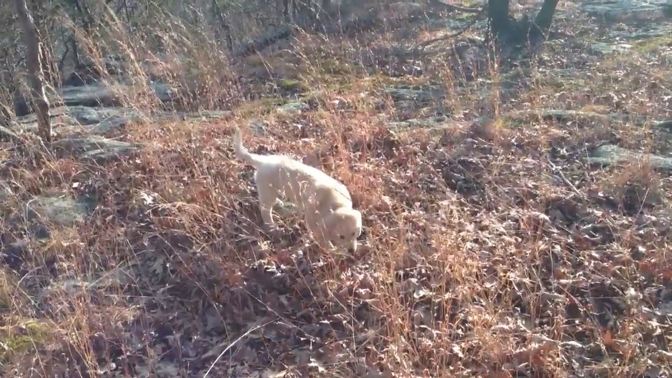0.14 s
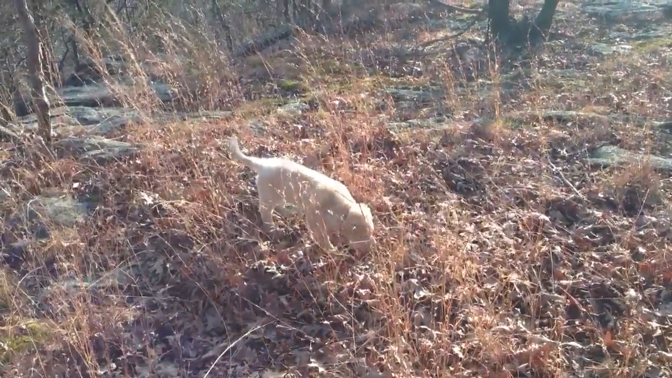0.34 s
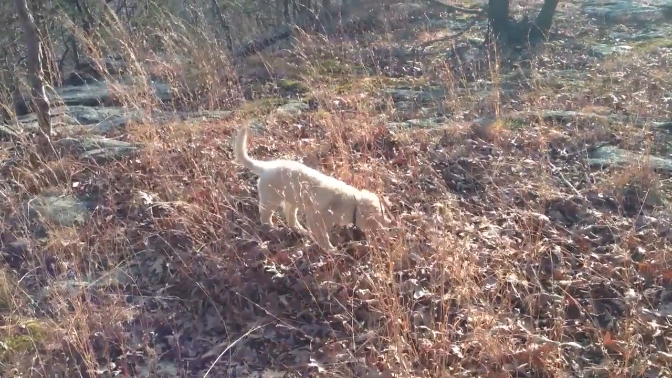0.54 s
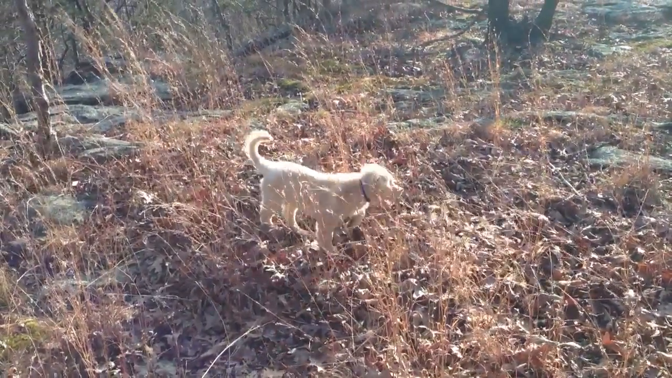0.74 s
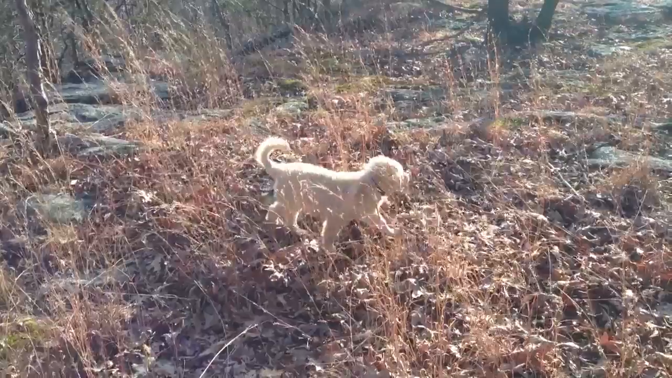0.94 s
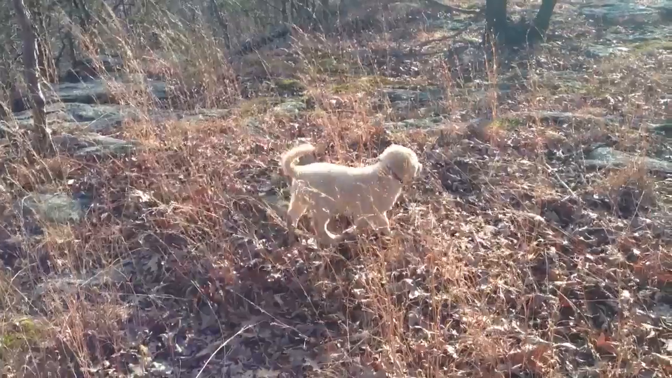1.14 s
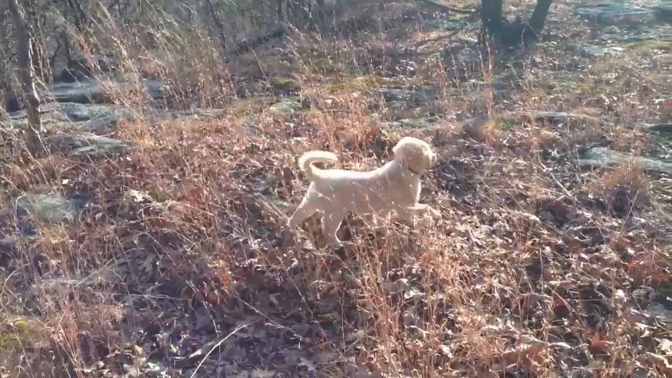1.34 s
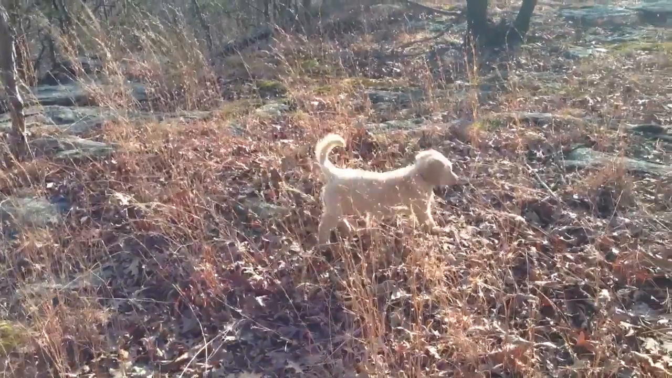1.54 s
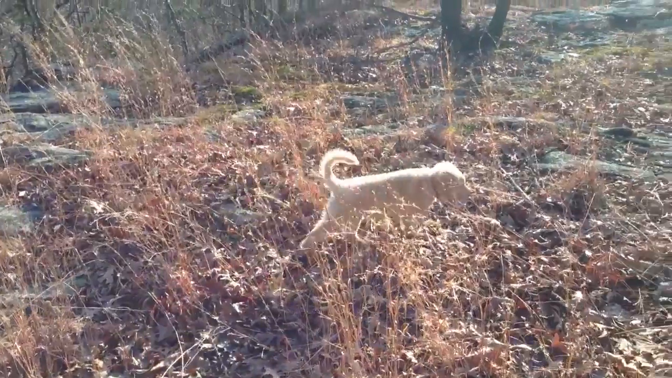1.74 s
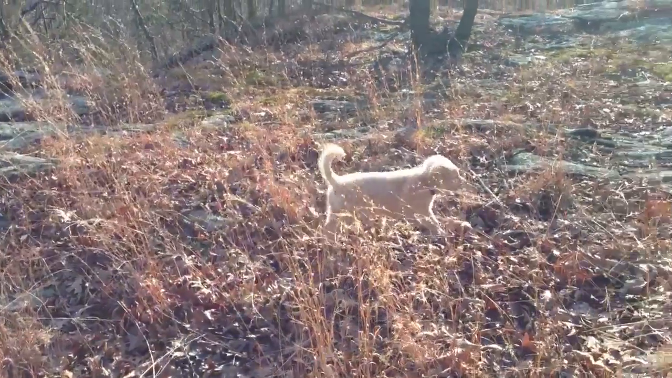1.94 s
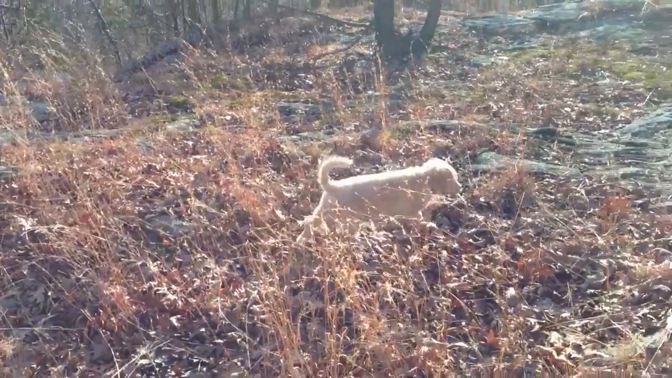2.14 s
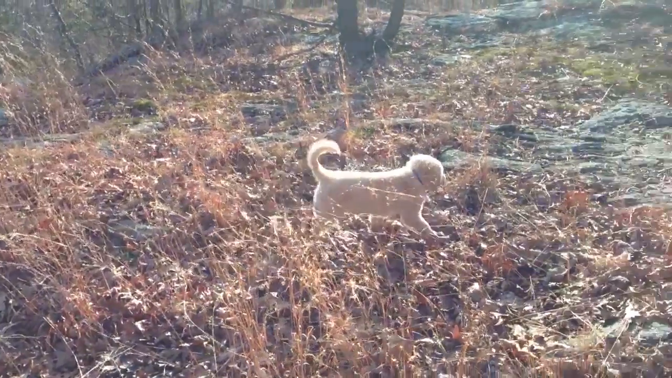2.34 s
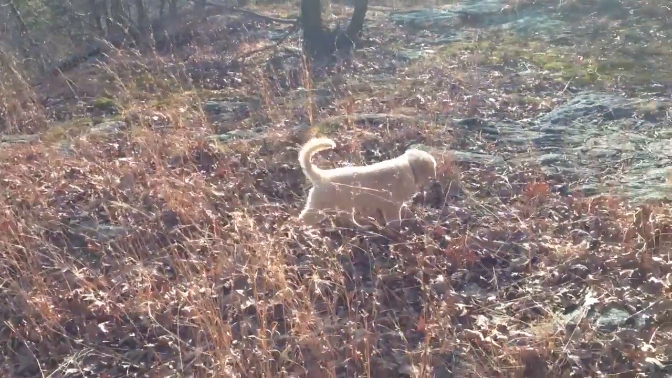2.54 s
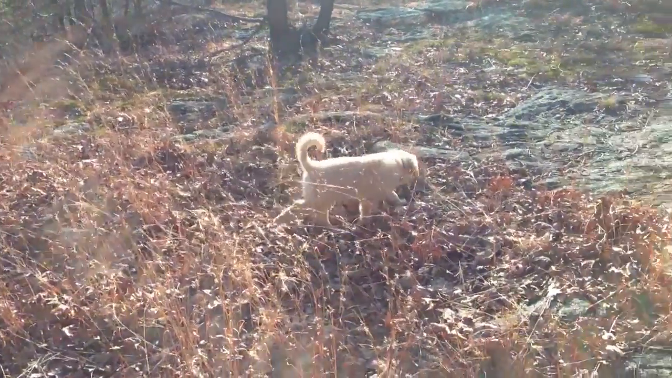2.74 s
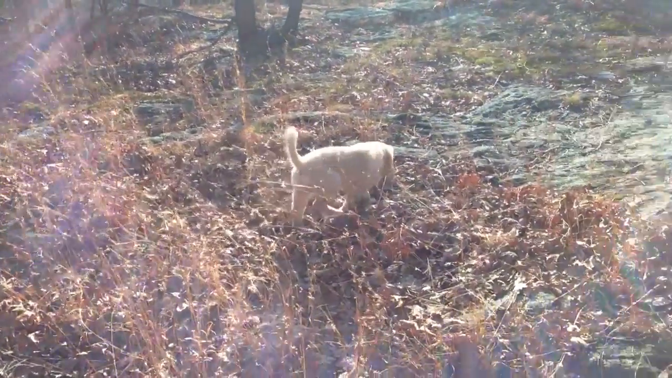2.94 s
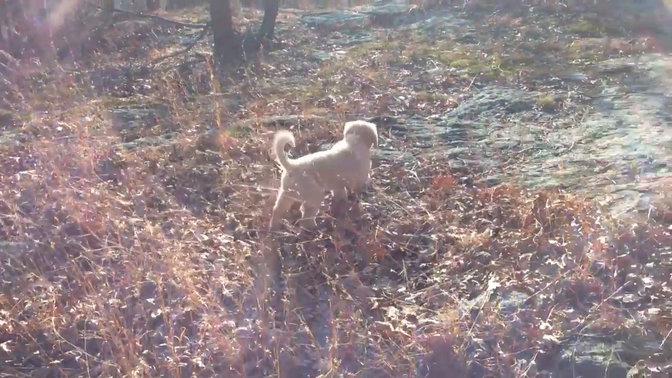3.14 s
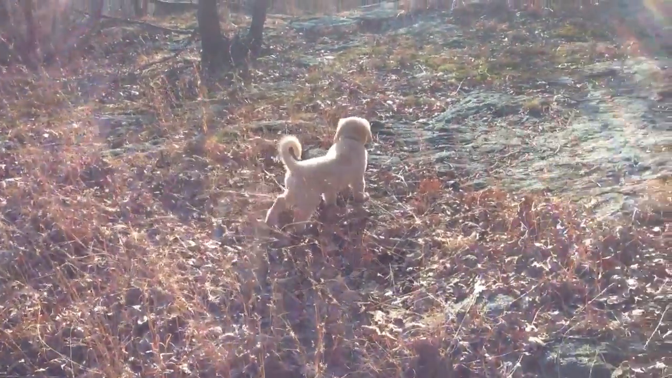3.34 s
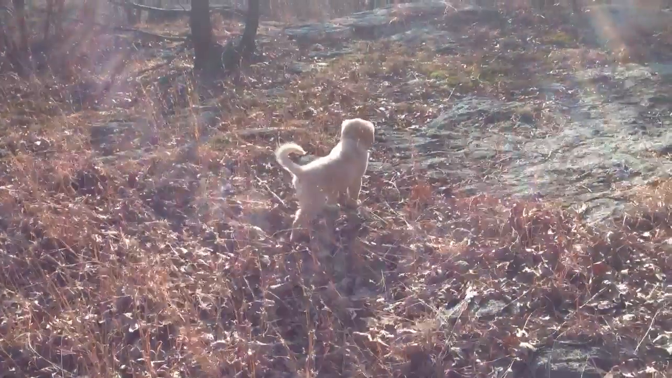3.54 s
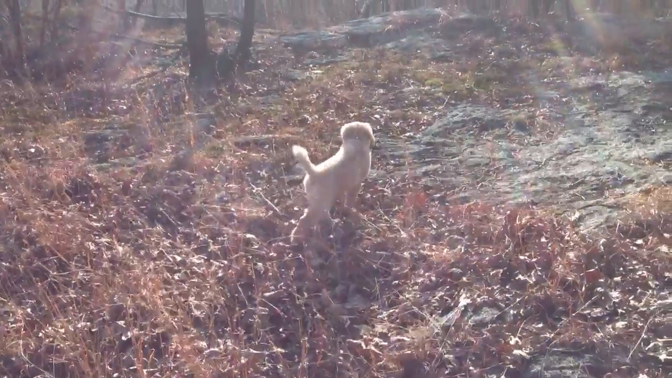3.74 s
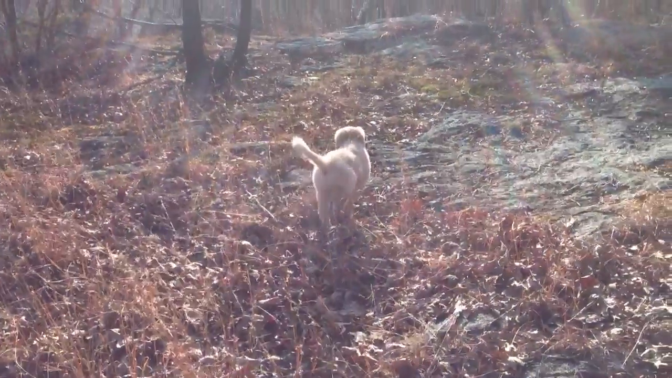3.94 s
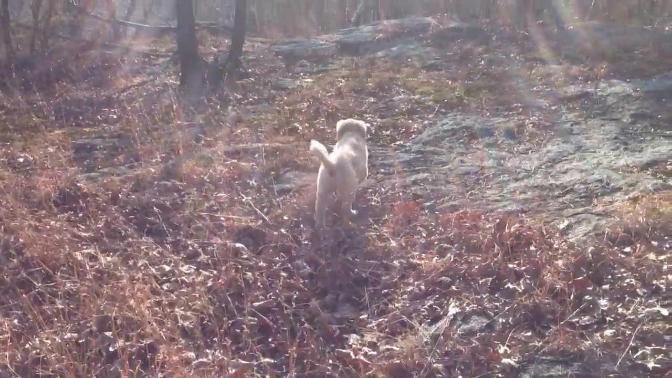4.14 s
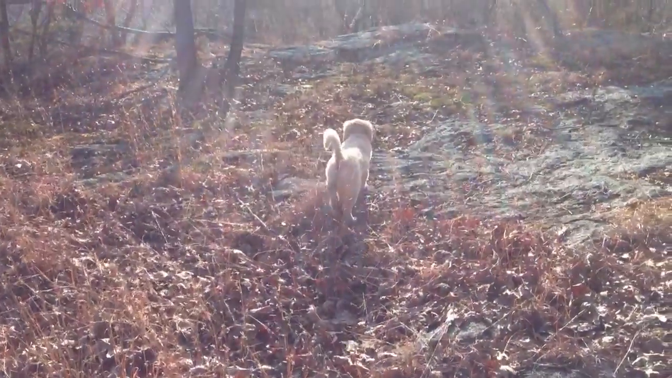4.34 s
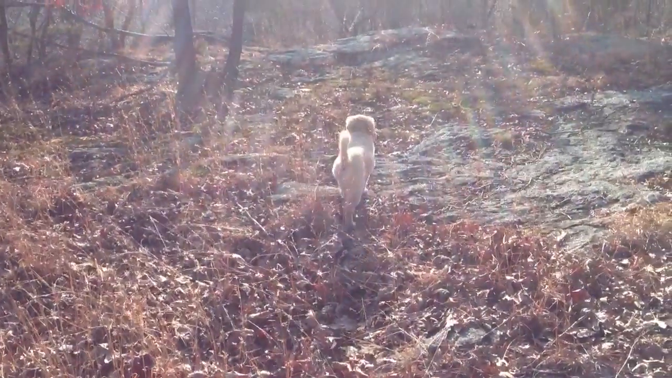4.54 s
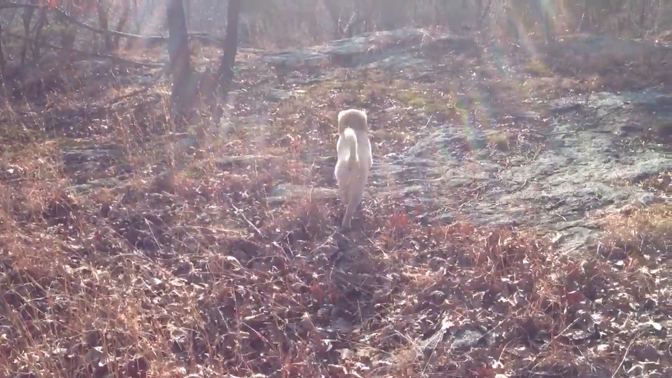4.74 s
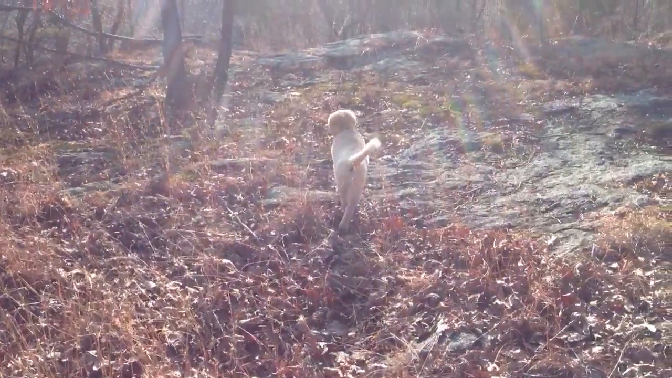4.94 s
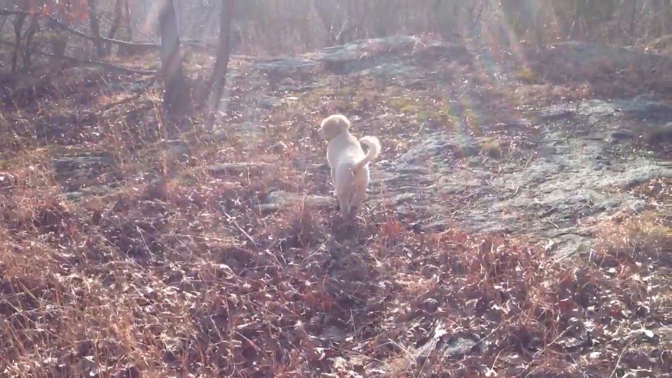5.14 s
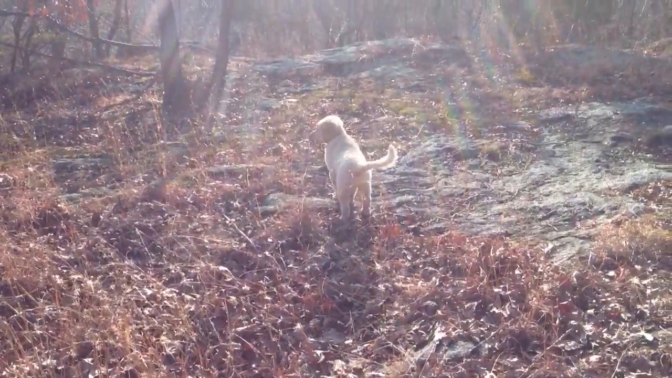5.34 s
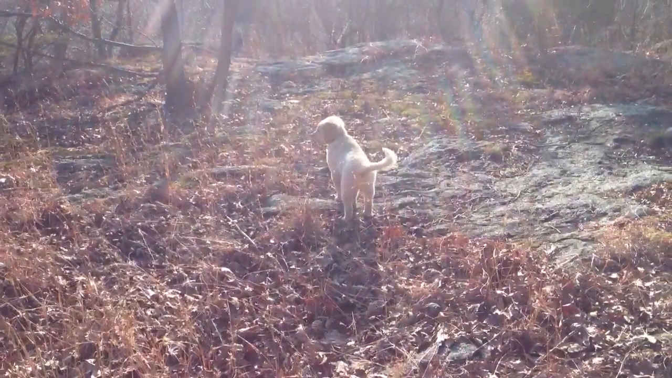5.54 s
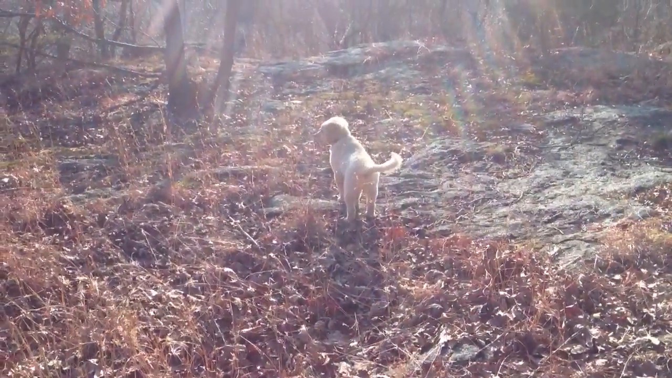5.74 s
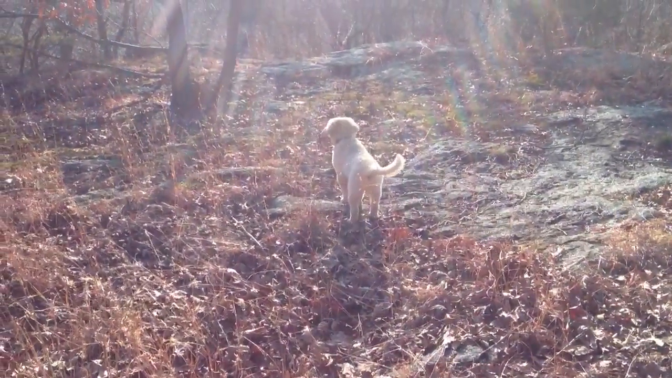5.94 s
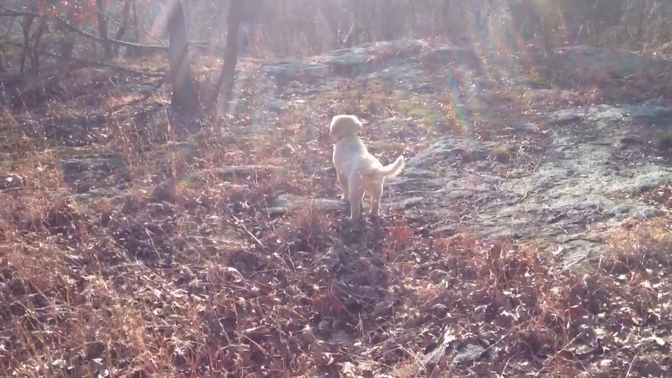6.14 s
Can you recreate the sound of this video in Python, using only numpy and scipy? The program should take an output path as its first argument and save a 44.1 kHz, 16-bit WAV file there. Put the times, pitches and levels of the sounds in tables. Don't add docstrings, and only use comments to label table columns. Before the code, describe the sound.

Brittle leaf litter crunches under light, quick paws, swelling to bright snapping close by, then thinning to faint ticks over distant rumble.

```python
import sys
import numpy as np
from scipy import signal
from scipy.fft import rfft, irfft
from scipy.io import wavfile
from scipy.ndimage import uniform_filter1d

SR = 44100
rng = np.random.default_rng(int(sys.argv[2]) if len(sys.argv) > 2 else 0)


def nominal_scale(level):
    x = np.asarray(level, float) / 20
    return 10 ** x


def dump_mix(stems):
    frames = np.atleast_2d(stems).T
    limited = np.clip(frames, -1, 1)
    pcm = np.round(limited * 32767).astype(np.int16)
    wavfile.write(sys.argv[1], SR, pcm)


N = 272964


def rms_one(x):
    return x / np.sqrt(np.mean(x ** 2) + 1e-20)


def in_time(rows):
    s, *columns = np.transpose(rows)
    return [np.interp(np.arange(N) / SR, s, column) for column in columns]


def drift(rate_hz):
    pole = np.exp(-2 * np.pi * rate_hz / SR)
    noise = rng.standard_normal(N + SR)
    settled = signal.lfilter([1], [1, -2 * pole, pole * pole], noise)[SR:]
    return rms_one(settled)


def ring(clicks, hz, t60_s):
    decay = nominal_scale(-60 / (t60_s * SR))
    turn = 2 * np.pi * hz / SR
    return signal.lfilter([0, np.sin(turn)], [1, -2 * decay * np.cos(turn), decay * decay], clicks + 1e-18)


def band(x, edges_hz):
    return signal.sosfilt(signal.butter(2, edges_hz, "band", fs=SR, output="sos"), x)


def colour(x, spectrum, size=8192):
    hz, level_db = np.transpose(spectrum)
    grid_hz = np.arange(size // 2 + 1) * SR / size + 1
    gain = nominal_scale(np.interp(np.log(grid_hz), np.log(hz), level_db))
    cepstrum = irfft(np.log(gain), size)
    cepstrum[1:size // 2] *= 2
    cepstrum[size // 2 + 1:] = 0
    response = irfft(np.exp(rfft(cepstrum)), size)
    return signal.fftconvolve(x, response)[:N]


SPLIT_HZ = 3000, 7000


def thirds(deep, middle, fine):
    hz = np.arange(N // 2 + 1) * SR / N
    below = 1 / (1 + (hz / SPLIT_HZ[0]) ** 6)
    above = 1 - 1 / (1 + (hz / SPLIT_HZ[1]) ** 8)
    shares = [(deep, below), (middle, 1 - below - above), (fine, above)]
    return [irfft(rfft(x) * share, N) for x, share in shares]


# (frequency [Hz], level [dB per Hz])
WOOD_SPECTRUM = [(25, -44), (60, -26), (85, -15.5), (130, -5.5), (250, -8), (400, -13), (480, -16.5),
                 (700, -13.5), (980, -15.5), (1150, -25.5), (3000, -26.5), (6000, -28.5), (15500, -30.5)]
# (pitch [Hz], curve of (time [s], level [dB]))
ENGINE_DRONES = [
    (199, [(0, -86), (.8, -63), (1.4, -92), (3.2, -73), (4.5, -79.5), (5, -67.5), (6.19, -67.5)]),
    (281, [(0, -63), (.4, -86), (2.6, -74), (3.5, -66.5), (4.2, -75.5), (4.9, -65.5), (5.75, -60.5), (6.19, -75)]),
    (368, [(0, -110), (1.4, -70), (2.4, -75), (3.5, -77), (5.3, -69.5), (6.19, -75)]),
]


def distance():
    out = nominal_scale(-62 - 1.5) * rms_one(colour(rng.standard_normal(N), WOOD_SPECTRUM))
    rumble = band(band(rng.standard_normal(N), (105, 260)), (105, 260))
    out += nominal_scale(-74.0 + 3.6 * drift(7.9)) * rms_one(rumble)
    for hz, curve in ENGINE_DRONES:
        phase = 2 * np.pi * np.cumsum(hz + 3.106 * drift(5.37)) / SR
        level_db = in_time(curve)[0] - 1.5 + 2.0 * drift(6.7)
        out += nominal_scale(level_db) * np.sin(phase)
    return out


# (time [s], rustle at 3-7 kHz [dB], deep crunch over it [dB])
GRASS_BRUSH = [(0, -61.5, -3.5), (.18, -62.5, 3), (.5, -58.5, 2), (.92, -59, -4.5), (1.14, -52, -1.5),
               (1.47, -55.5, -9), (1.88, -52, -6.5), (2.3, -48.5, -8), (2.8, -51, -2.5),
               (2.95, -55.5, -6.5), (3.7, -52.5, -4.5), (4.12, -55.5, -8.5), (4.55, -60, -7),
               (4.78, -67.5, -8), (5.3, -74, -12), (5.6, -75, -13), (6.19, -75, -3)]
# (full weight time [s], hold [s], crackle at 3-7
# kHz [dB], deep crunch over it [dB])
PAW_STEPS = [(0, 0.012, -57.5, -17), (.09, .045, -57.5, 1.5), (.21, 0.055, -63, 2), (.36, 0.11, -58.5, 3),
             (.565, 0.05, -53.5, -1.5), (.65, 0.011, -47, -26), (.72, 0.069, -53, -3.5),
             (.94, .015, -60, -3), (.98, .1, -46.5, -5.5), (1.17, .07, -50, -7),
             (1.25, 0.066, -47.5, -4.5), (1.39, 0.035, -50, -9), (1.52, 0.096, -49.5, -8.5),
             (1.595, 0.016, -48.5, -1), (1.635, 0.024, -38, -10), (1.685, 0.032, -47, -8),
             (1.73, 0.037, -43, -9), (1.96, 0.033, -44.5, -6.5), (2.0, .1, -49, -4.5),
             (2.137, 0.073, -35, -7.5), (2.2, 0.04, -46, -3.5), (2.335, 0.023, -48.5, -4.5),
             (2.375, 0.035, -39.5, -6), (2.44, 0.082, -47, -8), (2.55, 0.1, -43, -3.5),
             (2.695, 0.028, -44, -12), (2.74, 0.083, -48, -8),
             (2.994, .05, -51, -4), (3.061, 0.04, -44.5, -5), (3.116, 0.017, -51, -7),
                 (3.147, 0.014, -43.5, -7), (3.286, 0.12, -48, -6.5), (3.42, .06, -52, -5),
                 (3.587, 0.14, -49, -8.5), (3.698, 0.024, -45.5, -7.5), (3.8, 0.07, -50.5, -5.5),
                 (3.922, 0.055, -52.5, -9), (4.01, 0.041, -55.5, -3.5), (4.162, 0.094, -51.5, -11.5),
                 (4.299, 0.056, -52, -5), (4.39, .11, -56, -12), (4.595, 0.032, -60.5, -6),
                 (4.644, 0.052, -52, -6), (4.876, 0.013, -50.5, -6), (4.927, 0.038, -66.5, -6),
                 (5.006, 0.071, -63, -9), (5.114, 0.061, -54, -8.5), (5.255, 0.045, -65.5, -11),
                 (5.444, 0.064, -57, -7.5), (5.745, .01, -73, -7)]


def tread():
    press_db_per_s, lift_db_per_s = 529, 376
    hop = 44
    t = np.arange(0, N, hop) / SR
    brush_db, brush_deep_db = np.array(in_time(GRASS_BRUSH))[:, ::hop]
    power, deep = nominal_scale(2 * brush_db), nominal_scale(2 * (brush_db + brush_deep_db))
    for s, hold_s, crackle_db, crunch_db in PAW_STEPS:
        press_db = press_db_per_s * np.maximum(s - t, 0)
        lift_db = lift_db_per_s * np.maximum(t - s - hold_s, 0)
        step = nominal_scale(2 * (crackle_db - press_db - lift_db))
        power = power + step
        deep = deep + step * nominal_scale(2 * crunch_db)
    curves = np.transpose([t, 10 * np.log10(power), 10 * np.log10(deep / power)])
    level_db, deep_db = in_time(curves)
    fine_db = -2.5 - 0.34 * deep_db
    return level_db, deep_db, fine_db


def crackle(per_s, spread_db, clump_db, patchy_db, cycles, count=14):
    sizes = nominal_scale(spread_db * np.minimum(rng.exponential(1, N), 3.8)) * rng.choice([-1, 1], N)
    born = rng.random(N) < per_s * nominal_scale(clump_db * drift(45)) / SR
    dealt = rng.integers(0, count, N)
    out = np.zeros(N)
    for k, hz in enumerate(np.geomspace(500, 15000, count)):
        leaf = rms_one(ring(sizes * born * (dealt == k), hz, cycles / hz))
        out += leaf * np.sqrt(hz) * nominal_scale(patchy_db * drift(17.7))
    return out


# (frequency [Hz], level [dB per Hz])
LEAF_SPECTRUM = [(250, -26), (400, -14.5), (700, -12.5), (1100, -8.5), (1500, -7), (1950, -2), (2900, -4),
                 (3800, -3), (5000, 0.5), (6200, -1.5), (6900, -2), (8000, -4), (11500, -4.5),
                 (15500, -10.5)]


def litter(level_db, deep_db, fine_db):
    rub = rng.standard_normal(N) * nominal_scale(2.0 * drift(42))
    breaks = crackle(per_s=6000, spread_db=0.0, clump_db=3.5, patchy_db=4.5, cycles=3.6)
    bed = colour(rms_one(breaks) + 0.55 * rub, LEAF_SPECTRUM)
    steady = bed / np.sqrt(uniform_filter1d(bed ** 2, size=2200))
    deep, middle, fine = map(rms_one, thirds(steady, steady, steady))
    return nominal_scale(level_db - 1.98) * (nominal_scale(deep_db) * deep + middle + nominal_scale(fine_db) * fine)


SMALL_DEEP_DB = -5


def small_snaps(level_db, count=60):
    s, size, pitch, weight = rng.uniform(0, 1, (count, 4)).T
    s = s * 5.4
    peak_db = level_db[(s * SR).astype(int)] + 11 + 4 * (2 * size - 1)
    ring_hz = 3500 * nominal_scale(8 * pitch)
    return np.transpose([s, peak_db, ring_hz, SMALL_DEEP_DB + 9 * (2 * weight - 1)])


# (time [s], peak [dB], ring [Hz], deep part [dB])
CLEAR_SNAPS = [(0.0009, -37, 4020, -11), (0.4324, -41, 4200, 10), (0.6495, -29, 4700, -19),
               (0.6732, -28.5, 8800, -2), (1.321, -33, 2160, 5), (0.9759, -34, 7300, 4),
               (1.0073, -31, 7400, -3), (1.0374, -30, 5530, -6), (1.0744, -36, 4000, 10),
               (1.1709, -29, 4760, -10), (1.3564, -30, 9700, 7), (1.6024, -28.5, 4200, 9),
               (1.6639, -21.5, 7900, -12), (1.768, -24.5, 5870, -1), (1.8011, -30, 9600, -11),
               (1.8212, -18.5, 5860, -6), (1.8744, -33, 4620, -11), (1.9796, -23.5, 6300, 0),
               (2.0288, -25.5, 7500, -20), (2.093, -25.5, 4600, 6.5), (2.1355, -39, 5300, -11),
               (2.1927, -15, 4000, -13), (2.2433, -24.5, 6500, 0), (2.3356, -29, 4700, -6),
               (2.3775, -24, 6740, 0), (2.3977, -17, 4370, -6), (2.4047, -12.5, 3530, -7),
               (2.4914, -21.5, 7050, 4), (2.4947, -26.5, 2760, 5.5), (2.4997, -22, 4000, -16),
               (2.6346, -31, 4830, -2), (2.689, -34, 7000, -12), (2.7409, -23, 3850, -19),
                 (2.8457, -31, 5600, -3), (2.988, -36, 4700, -15), (3.1549, -34, 5640, -9),
                 (3.4705, -26, 4300, -11), (3.5057, -28, 4100, -12), (3.7254, -37, 5300, -14),
                 (3.7474, -31, 4670, -14), (3.9278, -32, 8300, -3), (3.9366, -28, 9160, 4.5),
                 (3.9396, -29, 6000, -16), (3.9645, -41, 7800, -13), (3.9779, -31.5, 5440, 3.5),
                 (4.299, -34, 5600, -8), (4.2575, -36, 7900, -6), (4.494, -38, 7150, -11),
                 (4.6, -36, 4600, 2), (4.71, -30.5, 3580, -26), (4.8417, -38.5, 4870, 0),
                 (4.858, -46, 4530, -19), (4.874, -28.5, 7200, 4), (5.0082, -44, 8540, -8),
                 (5.0246, -42.5, 4600, -2), (5.11, -37, 5000, -8), (5.262, -40, 7760, 9),
                 (5.5492, -51, 5200, -15), (5.5689, -48, 4900, -14), (5.6094, -47, 4600, -10)]
# (time [s], peak [dB], ring [Hz])
SETTLING_TICKS = [(.0197, -47, 6000), (0.137, -44, 2420), (.2612, -42, 4100), (0.3226, -38, 3700),
                  (.5663, -39, 4750), (.5978, -38, 3970), (.8973, -40, 4720), (1.093, -34, 5300),
                  (1.3652, -31, 7200), (1.4656, -38.5, 7800), (1.5566, -33, 7600), (1.6305, -31, 5500),
                  (1.842, -33, 4900), (2.4448, -31, 4600), (2.477, -32, 4600), (2.5295, -28, 6860),
                  (3.3716, -32, 3920), (3.5575, -34, 4500), (3.5882, -31, 4900), (3.8597, -39, 4930),
                  (4.3616, -47, 4500), (4.451, -48, 6400), (4.6906, -40, 5600), (4.7465, -46, 5100),
                  (4.8955, -35, 8850), (5.0183, -40, 6800), (5.0354, -51, 5800), (5.0586, -48, 8450),
                  (5.089, -46, 7900), (5.2407, -46, 5300)]


def snaps(small):
    t = np.arange(512) / SR
    trains = np.zeros((3, N + len(t)))
    ticks = [(*tick, SMALL_DEEP_DB) for tick in SETTLING_TICKS]
    for s, peak_db, hz, deep_db in [*CLEAR_SNAPS, *ticks, *small]:
        fine_db = 10.5 * np.log2(hz / 6000)
        splinter = .6 * nominal_scale(-60 * t / .007) + .1 * nominal_scale(-60 * t / .02)
        burst = rng.standard_normal(len(t)) * splinter
        burst[0] = np.sign(burst[0])
        burst += .12 * ring(burst, hz, .0045)
        burst /= np.linalg.norm(burst)
        at = round(s * SR)
        parts_db = np.array([[deep_db], [0], [fine_db]])
        trains[:, at:at + len(t)] += nominal_scale(peak_db + 15.5 + parts_db) * burst
    trains = signal.lfilter(*signal.butter(1, 900, "high", fs=SR), trains)
    return sum(thirds(*[colour(train, LEAF_SPECTRUM) for train in trains]))


# (time [s], peak [dB], pitch [Hz])
SOFT_PUSHES = [
    (.114, -44, 580),
    (.425, -44, 613),
    (1.12, -47, 510),
    (1.6, -60, 800),
    (3.775, -45, 152),
    (3.809, -46.5, 211),
    (3.826, -48, 136),
    (3.849, -46, 221),
    (3.889, -50, 201),
    (3.957, -44, 237),
]


def wind():
    out, t = np.zeros(N), np.arange(2000) / SR
    for s, peak_db, hz in SOFT_PUSHES:
        at, rise_s = round(s * SR), 0.0016 + 0.8 / hz
        swell = t / rise_s * np.exp(1 - t / rise_s) * np.hanning(len(t)) ** 0.52
        out[at:at + len(t)] += nominal_scale(peak_db) * swell * np.sin(2 * np.pi * hz * t)
    return out


# (frequency [Hz], level [dB])
GROUND_DIPS = [(2300, 0), (3100, -4), (3650, 1.5), (4300, 0), (6000, 0), (6700, -5), (7200, .5), (9700, 1),
               (11300, -3), (12300, 0), (14000, 0), (15200, -4)]


def scene():
    paws = tread()
    near = litter(*paws) + snaps(small_snaps(paws[0]))
    near = colour(near, GROUND_DIPS)
    echo = np.roll(band(near, (800, 6000)), round(0.0096 * SR))
    return (near + nominal_scale(-17.5) * echo + distance() + wind())[None]


def top_cut(x):
    return signal.sosfilt(signal.butter(12, 16500, fs=SR, output="sos"), x)


def record(dry):
    no_bass = signal.sosfilt(signal.butter(1, 60, "high", fs=SR, output="sos"), dry)
    cut = signal.sosfilt(signal.ellip(10, .5, 42, 15270, fs=SR, output="sos"), no_bass)
    return top_cut(cut)


dry = scene()
out = record(dry)
dump_mix(out)
```